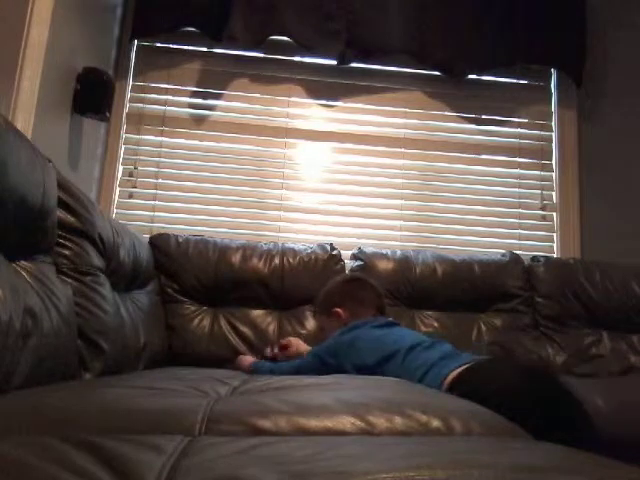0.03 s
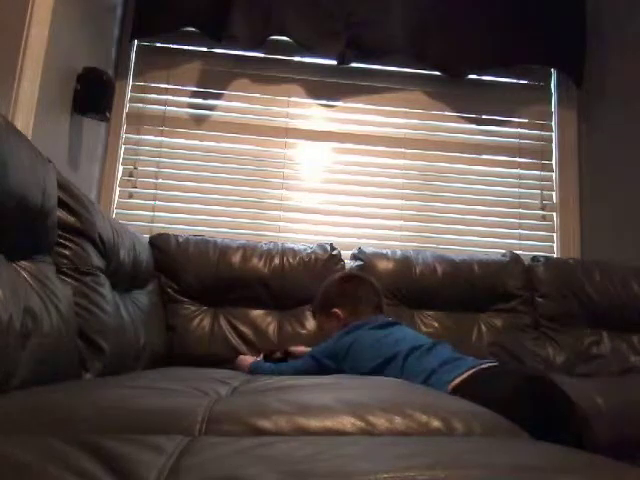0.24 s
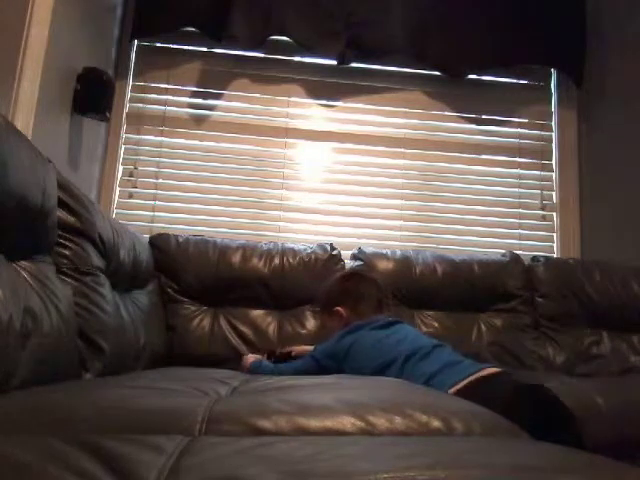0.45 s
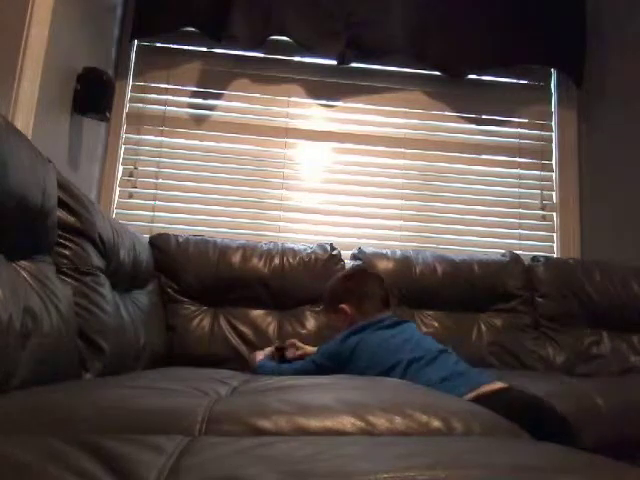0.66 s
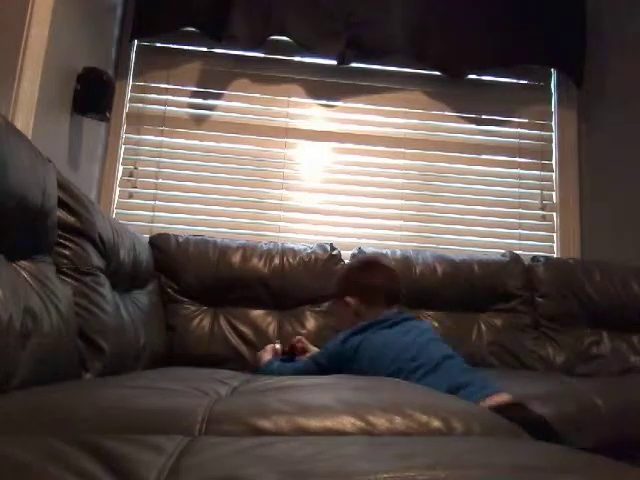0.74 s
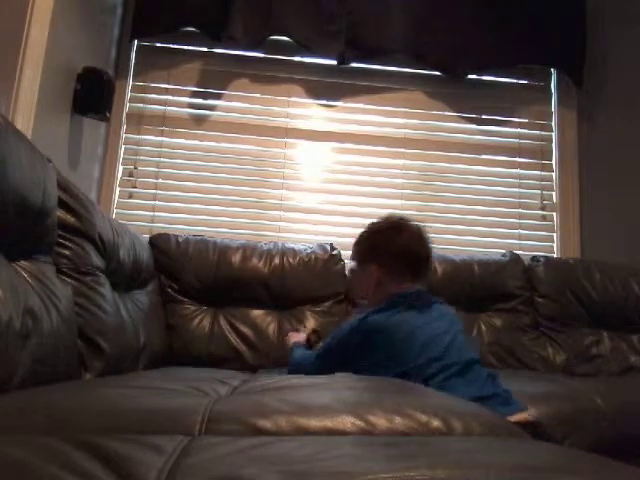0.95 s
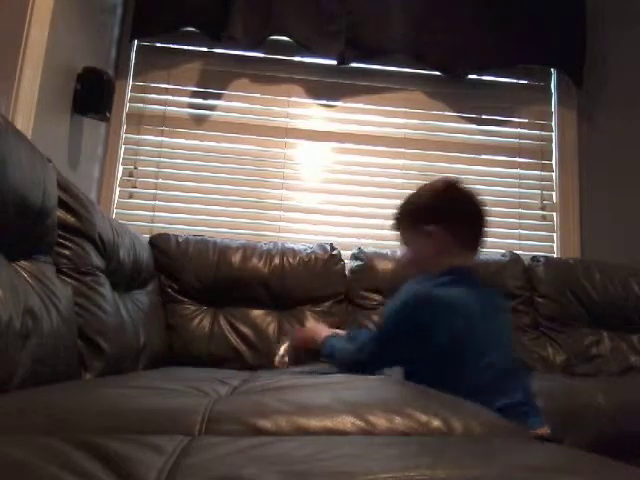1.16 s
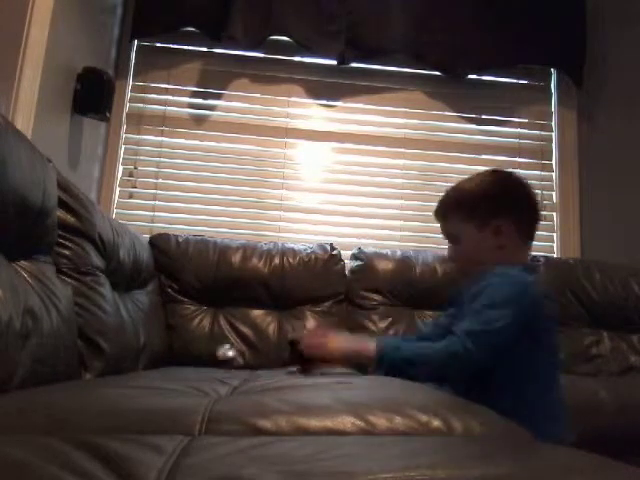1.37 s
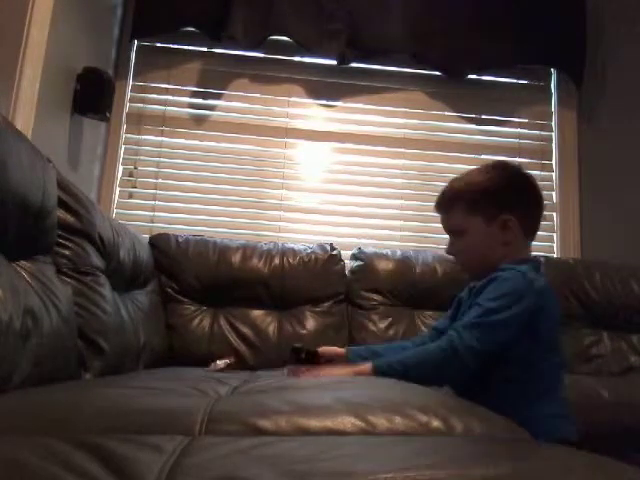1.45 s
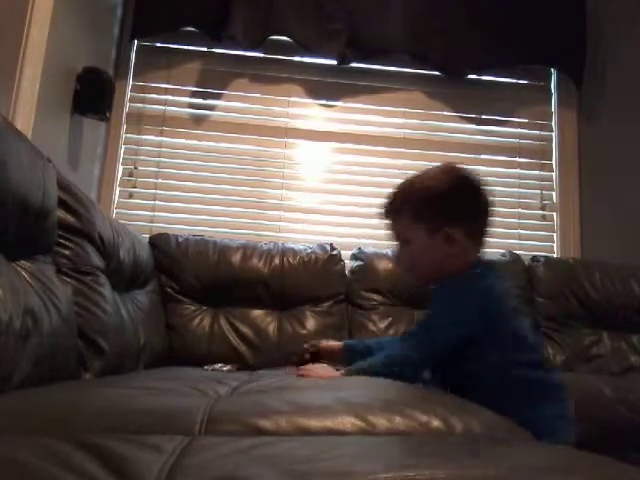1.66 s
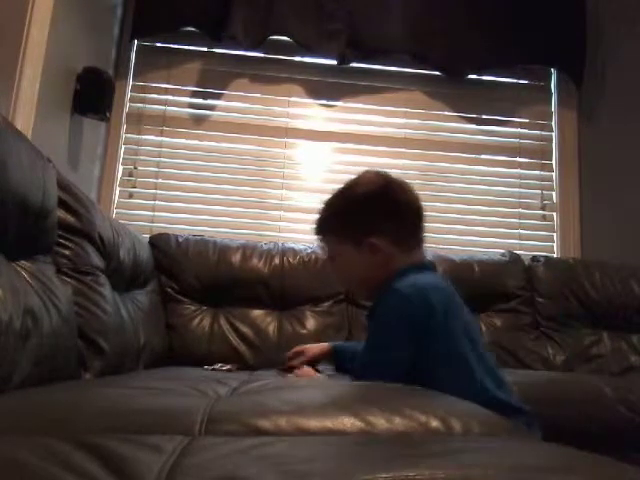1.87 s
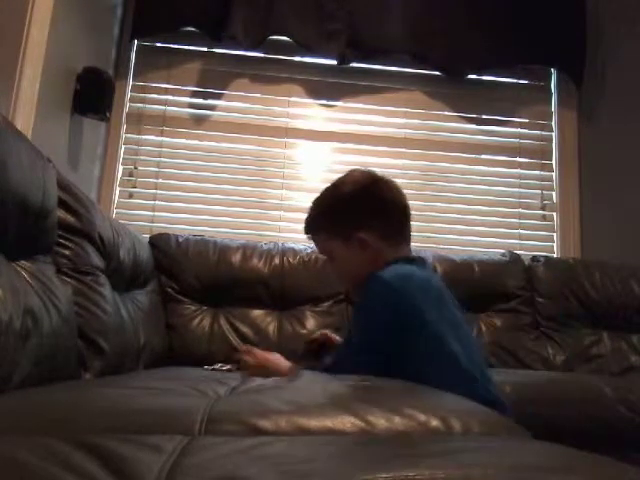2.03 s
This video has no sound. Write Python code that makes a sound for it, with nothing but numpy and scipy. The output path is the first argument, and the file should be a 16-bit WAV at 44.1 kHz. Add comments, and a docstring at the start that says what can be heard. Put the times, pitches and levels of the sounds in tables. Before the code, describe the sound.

Leather rustles and creaks under a moving child, with plastic toys clicking and a padded bump.

```python
"""A child pushes up from a leather couch in a living room, small toys in hand.
First a sleeve brushes the cushions, the sliding hide crackles, creases snap loose and the toys click.
The hide squeaks faintly where it sticks; around one second come more snaps and the toys ring.
Then an arm is planted: the padded frame thuds and the seat sinks with a low rumble under the weight.
Last creaks, brushes and snaps thin out over a faint steady hiss."""
import sys
import numpy as np
from scipy import signal
from scipy.fft import rfft, irfft
from scipy.io import wavfile

SR = 44100
rng = np.random.default_rng(int(sys.argv[2]) if len(sys.argv) > 2 else 0)


def put_to_file(sound):
    """Save the sound as 16-bit audio at rate SR, in the file named by the first command-line argument."""
    columns = np.atleast_2d(sound).T  # one column per channel
    safe = np.clip(columns, -1, 1)
    whole_steps = np.round(safe * 32767)
    wavfile.write(sys.argv[1], SR, whole_steps.astype(np.int16))


N = 92610

# fader curve of the sliding hide: time_s, level_db
HIDE_SLIDE = [(0, -57), (.12, -62), (.22, -36.5), (.3, -53.5), (.35, -31.5), (.38, -49), (.44, -45.5),
              (.49, -68), (.55, -45), (.64, -64.5), (.73, -42), (.79, -53), (.9, -51), (.95, -41),
              (1.13, -43.5), (1.22, -37), (1.29, -57), (1.34, -41.5), (1.41, -42.5), (1.45, -50),
              (1.52, -38.5), (1.65, -38), (1.73, -52.5), (1.8, -40), (1.91, -60), (2.04, -63), (2.1, -39)]
# bright EQ of the fine crackle: freq_hz, gain_db
CRACKLE_EQ = [(300, -68), (1500, -13), (3300, -15), (4300, -6.5), (5300, -9.5), (6100, 0), (6800, 3.5),
              (7200, -3.5), (7800, -13), (8700, -22.5), (11000, -29.5), (16000, -27)]
# folds that creak: start_s, length_s, level_db
FOLD_CREAKS = [(0.298, 0.22, -42.5), (0.68, 0.21, -51), (0.921, 0.13, -47), (0.984, 0.24, -44.5),
               (1.14, 0.19, -42.5), (1.309, 0.13, -43), (1.494, 0.068, -40.5), (1.571, 0.069, -39),
               (1.684, 0.14, -53), (1.751, 0.039, -44)]
# creases letting go: start_s, level_db, ring_offset_db
CREASE_SNAPS = [(0.1961, -43.5, -1), (0.2124, -48.5, -2), (0.2305, -41, -21), (0.255, -43, -3),
                (0.3151, -36, -5.5), (0.511, -57.5, -1.5), (0.7296, -40, -28), (0.752, -50.5, 5.5),
                (0.9625, -36.5, -33), (.9695, -43, -27), (1.01, -42, -13), (1.017, -30, -33),
                (1.04, -38.5, -7), (1.075, -39.5, -6), (1.157, -33, -9), (1.202, -34.5, -14),
                (1.5111, -34, -4), (1.6658, -35, -21), (1.7938, -39.5, -20), (2.0672, -47, -18)]
# sharp crack of snaps and clicks: freq_hz, gain_db
SNAP_EQ = [(200, -46), (800, -37.5), (1400, -18.5), (3400, -11), (4200, -0.5), (5300, -5), (6400, 9),
           (7200, 5.5), (7800, -5), (8600, -17.5), (11500, -30), (16000, -52)]
# midrange ring of snaps, clicks and creaks: freq_hz, gain_db
RING_EQ = [(500, -31.5), (1200, -21), (1700, -8), (2050, -4.5), (2350, 3), (2800, 4), (3300, -5),
           (4200, -10.5), (6000, 0), (16000, -78)]
# sticking hide squeaks or groans: start_s, length_s, level_db, pitch_hz
HIDE_SQUEAKS = [(0.142, 0.059, -56, 1710), (0.504, 0.11, -55, 4100), (0.534, 0.34, -64.5, 597),
                (0.728, 0.054, -64.5, 10600)]
# plastic toys click together: start_s, level_db, edge_offset_db
TOY_CLICKS = [(0.3207, -28, -23), (0.3266, -25.5, -13.5), (0.917, -45, -14), (1.1496, -31.5, -21),
              (1.167, -34, -12), (1.173, -37.5, -6.5), (1.3222, -37.5, -14.5), (1.4657, -39.5, -36),
              (1.503, -34.5, -13)]
# hard top edge of a click: freq_hz, gain_db
EDGE_EQ = [(2000, -21.5), (9500, -4), (12000, -6), (15000, -0.5)]
# knocked toys ring: start_s, pitch_hz, level_db, t60_s
TOY_CLINKS = [(0.1957, 5300, -30, 0.0099), (.256, 6100, -35, 0.019), (.256, 2940, -49.5, .3),
              (0.262, 12900, -56, 0.16), (0.2626, 2830, -35, 0.023), (0.2636, 5760, -28.5, 0.018),
              (.3222, 4830, -23, 0.014), (1.004, 2308, -45, 0.42), (1.158, 1688, -45.5, 0.21),
              (1.17, 6680, -25.5, .09), (1.4665, 4950, -33, 0.014), (1.512, 6720, -31.5, 0.099)]
# blows on the padded frame: start_s, strength_db, contact_s
FRAME_BLOWS = [(0.353, -45, 0.0024), (1.339, -26, 0.00615), (1.349, -23, 0.005), (1.381, -27, 0.0034),
               (1.404, -30.5, 0.0034), (1.503, -37, 0.00084), (1.521, -32, 0.0016)]
# modes of the frame: pitch_hz, gain_db, t60_s
FRAME_MODES = [(88.4, -2, 0.22), (118.4, -4, 0.16), (179, -9.5, 0.05), (248, 1.5, 0.06), (296, -1.5, 0.083),
               (516, 2, 0.18)]
# weight shifts on the cushions: start_s, length_s, level_db
WEIGHT_SHIFTS = [(0.177, 0.17, -52), (0.275, 0.29, -54.5), (0.512, 0.11, -55.5), (0.715, 0.18, -67),
                 (0.87, 0.27, -61), (1.326, 0.23, -46), (1.46, 0.17, -46), (1.736, 0.32, -55)]
# bassy EQ of the stuffing: freq_hz, gain_db
CUSHION_EQ = [(30, -30), (60, -9), (100, -1), (145, 1.5), (200, -11), (270, -5.5), (380, -18.5), (900, -25),
              (3000, -51)]
# the seat sinks under knee and arm: start_s, length_s, level_db
SEAT_SINKS = [(1.393, 0.2, -42), (1.58, 0.19, -47.5), (1.713, 0.57, -60.5)]
# sleeve and hands brush the cushion: start_s, length_s, level_db
SLEEVE_BRUSHES = [(0.129, 0.26, -53.5), (0.319, 0.035, -47.5), (0.864, 0.13, -58), (1.305, 0.44, -55.5),
                  (1.457, 0.047, -48), (1.486, 0.12, -48.5), (1.601, 0.045, -47), (1.645, 0.12, -48.5),
                  (1.81, 0.051, -48.5), (2.063, 0.056, -50.5)]
# dull EQ of the cloth: freq_hz, gain_db
SLEEVE_EQ = [(100, -7), (400, -3.5), (560, 0.5), (850, -4.5), (1300, -1), (1750, -2), (2300, -7.5),
             (5000, -10), (16000, -54)]
# dark EQ of the background hiss: freq_hz, gain_db
FLOOR_EQ = [(20, -20), (45, 12.5), (130, 4.5), (300, -3.5), (600, -3), (2500, -7.5), (4500, -16.5),
            (7500, -18), (16000, -26)]

CRACKLE_DB, SLIDE_HISS_DB, FLOOR_DB = -2.5, -19, -64.5
SLIP_S = 0.00044  # swell and fade of one tiny slip
SNAP_RISE_S, SNAP_S = 0.0025, 0.0052
CLICK_RISE_S, CLICK_S, CLICK_RING_DB = 0.0008, 0.0045, -14
CLINK_RISE_S, SINK_HZ = 0.0012, 70.5
CLINK_SPREAD, SQUEAK_WIDTH, SINK_WIDTH = 0.0364, 0.16, 0.9  # shares of the pitch
ATTACK_SHARE, RELEASE_SHARE, SAG_DB = 0.11, 0.3, 18  # envelope of every stroke
EARLY_T60_S, EARLY_DB, REFLECTION_RISE_S = 0.055, -3, 0.0037
WALL_T60_S, WALL_DB, WALL_TOP_HZ = 0.36, -3, 8750
LOW_CUT_HZ, HIGH_CUT_HZ = 89, 15900


def leather(t):
    """Fine crackle of the sliding hide, layered with the coarser creak of its folds."""
    grain = amp(CRACKLE_DB) * slips(per_s=890, spread_db=5)
    hiss = amp(SLIDE_HISS_DB) * rng.standard_normal(N)
    fader = amp(np.interp(t, *np.array(HIDE_SLIDE).T))
    crackle = colour((grain + hiss) * fader, CRACKLE_EQ)
    creak = colour(slips(per_s=750, spread_db=4) * strokes(t, FOLD_CREAKS), RING_EQ)
    return crackle + creak


def crease_snaps():
    """A crease lets go with a bright snap and a lower ring."""
    return sum(burst(start, db + layer_db, eq, SNAP_RISE_S, SNAP_S)
               for start, db, ring_db in CREASE_SNAPS
               for layer_db, eq in [(0, SNAP_EQ), (ring_db, RING_EQ)])


def hide_squeaks(t):
    """Sticking hide rubs in one narrow resonance."""
    return sum(strokes(t, [(start, length, db)]) * resonance(hz, SQUEAK_WIDTH)
               for start, length, db, hz in HIDE_SQUEAKS)


def toy_clicks():
    """Plastic on plastic: a quick crack, a midrange ring and a hard top edge."""
    return sum(burst(start, db + layer_db, eq, CLICK_RISE_S, CLICK_S)
               for start, db, edge_db in TOY_CLICKS
               for layer_db, eq in [(0, SNAP_EQ), (CLICK_RING_DB, RING_EQ), (edge_db, EDGE_EQ)])


def toy_clinks(t, modes=8):
    """Each knock starts a cluster of close modes; a gripped toy is damped at once, a loose one rings."""
    out = 0
    for start, hz, db, t60 in TOY_CLINKS:
        detune, phases = rng.random((2, modes))
        age = np.maximum(t - start, 0)
        envelope = np.minimum(age / CLINK_RISE_S, 1) * decay(age, t60)
        pitches = hz * (1 + CLINK_SPREAD * (2 * detune - 1))
        ring = envelope * sum(np.sin(2 * np.pi * (f * age + p)) for f, p in zip(pitches, phases))
        out += amp(db) * ring * np.linalg.norm(envelope) / np.linalg.norm(ring)
    return out


def frame_thuds(t):
    """Padded blows ring the low modes of the couch; a longer contact gives a duller thud."""
    force = np.zeros(N)
    for start, db, contact in FRAME_BLOWS:
        push = np.sin(np.pi * np.clip((t - start) / contact, 0, 1))
        force += amp(db) * push / push.sum()
    ring = sum(amp(db) * np.cos(2 * np.pi * hz * t) * decay(t, t60) for hz, db, t60 in FRAME_MODES)
    return signal.fftconvolve(force, ring)[:N] / 2


def cushions(t):
    """The stuffing rumbles under shifting weight, lower where the seat sinks."""
    rumble = colour(rng.standard_normal(N) * strokes(t, WEIGHT_SHIFTS), CUSHION_EQ)
    low_end = strokes(t, SEAT_SINKS) * resonance(SINK_HZ, SINK_WIDTH)
    return rumble + low_end


def sleeve(t):
    """Cloth brushes over the cushions in dense, dull slips."""
    return colour(slips(per_s=2900, spread_db=2) * strokes(t, SLEEVE_BRUSHES), SLEEVE_EQ)


def room(x, t, places=20):
    """Direct sound, quick reflections off the couch and a duller wall tail, shifting as the child moves."""
    age = t[:N // 4]
    wall_lowpass = signal.butter(1, WALL_TOP_HZ, fs=SR)
    position = t / t[-1] * (places - 1)
    out = x.copy()
    for place in range(places):
        crossfade = np.cos(np.pi / 2 * np.clip(position - place, -1, 1))
        early = reflections(age, EARLY_T60_S, EARLY_DB)
        tail = signal.lfilter(*wall_lowpass, reflections(age, WALL_T60_S, WALL_DB))
        out += signal.fftconvolve(x * crossfade, early + tail)[:N]
    return out / np.sqrt(1 + amp(EARLY_DB) ** 2 + amp(WALL_DB) ** 2)


def reflections(age, t60, db):
    """Dense echoes build up after the direct sound and die away."""
    echoes = rng.standard_normal(len(age)) * np.minimum(age / REFLECTION_RISE_S, 1) * decay(age, t60)
    return amp(db) * echoes / np.linalg.norm(echoes)


def noise_floor():
    """A faint, steady bed of dark hiss."""
    return amp(FLOOR_DB) * colour(rng.standard_normal(N), FLOOR_EQ)


def slips(per_s, spread_db):
    """Tiny stick-slip grains at random moments, a few much stronger than the rest; rms 1."""
    strength = amp(spread_db * np.minimum(rng.exponential(size=N), 4))
    triggers = rng.random(N) < per_s / SR
    age = np.arange(SR // 100) / SR
    power = np.convolve(triggers * strength ** 2, age * np.exp(-age / SLIP_S))[:N]
    return unit(np.sqrt(power) * rng.standard_normal(N))


def strokes(t, rows):
    """Envelope of a series of movements: each swells, sags and lets go."""
    out = 0
    for start, length, db in rows:
        progress = np.clip((t - start) / length, 0, 1)
        fades = np.minimum(progress / ATTACK_SHARE, (1 - progress) / RELEASE_SHARE)
        out += amp(db - SAG_DB * (progress - ATTACK_SHARE)) * np.minimum(1, fades)
    return out


def burst(start, db, eq, rise_s, length_s):
    """A transient of a few milliseconds: noise with its spectrum flattened, then shaped by an EQ."""
    age = np.arange(SR // 20) / SR
    envelope = np.minimum(age / rise_s, 1) * np.exp(-(age / length_s) ** 4)
    phases = np.angle(rfft(rng.standard_normal(len(age)) * envelope))
    flat = irfft(np.exp(1j * phases), len(age))
    crack = colour(flat * np.sqrt(envelope), eq)
    crack *= amp(db) * np.sqrt(2 * length_s * SR / np.sum(crack ** 2))
    return np.pad(crack, (int(start * SR), N))[:N]


def resonance(hz, width):
    """An unsteady band of noise around one pitch; rms 1."""
    offset = 2 * (np.fft.rfftfreq(N, 1 / SR) - hz) / (width * hz)
    return unit(irfft(rfft(rng.standard_normal(N)) / (1 + offset ** 2), N))


def colour(x, eq, taps=4096):
    """Minimum-phase EQ through (freq_hz, gain_db) points that keeps the power of white noise."""
    hz, db = np.array(eq).T
    freqs = np.maximum(np.fft.rfftfreq(taps, 1 / SR), 1)
    gain = amp(np.interp(np.log(freqs), np.log(hz), db))
    cepstrum = irfft(np.log(gain))
    cepstrum[1:taps // 2] *= 2  # fold it so that nothing rings ahead of an attack
    cepstrum[taps // 2 + 1:] = 0
    impulse = irfft(np.exp(rfft(cepstrum)))
    return signal.fftconvolve(x, impulse / np.linalg.norm(impulse))[:N]


def decay(age, t60):
    """A fade of 60 dB every t60 seconds."""
    return np.exp(-np.log(1000) * age / t60)


def amp(db):
    """Decibels to gain."""
    return 10 ** (np.asarray(db) / 20)


def unit(x):
    """Scale to rms 1."""
    return x / np.sqrt(np.mean(x ** 2))


def scene():
    """Mono mix: surface sounds go through the room; clinks, low end and the hiss bed stay dry."""
    t = np.arange(N) / SR
    bed = noise_floor()
    surface = leather(t) + sleeve(t) + crease_snaps() + toy_clicks() + hide_squeaks(t)
    return (room(surface, t) + toy_clinks(t) + cushions(t) + frame_thuds(t) + bed)[None]


def record(dry):
    """A gentle low cut thins the deepest bass and a steep high cut trims the top."""
    low_cut = signal.butter(2, LOW_CUT_HZ, "highpass", fs=SR, output="sos")
    high_cut = signal.ellip(10, .2, 70, HIGH_CUT_HZ, fs=SR, output="sos")
    return signal.sosfilt(high_cut, signal.sosfilt(low_cut, dry))


dry = scene()
out = record(dry)
put_to_file(out)
```